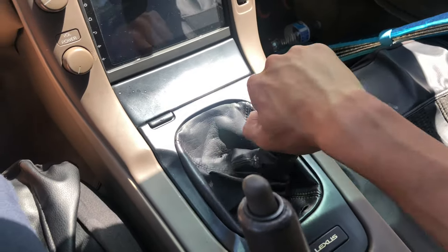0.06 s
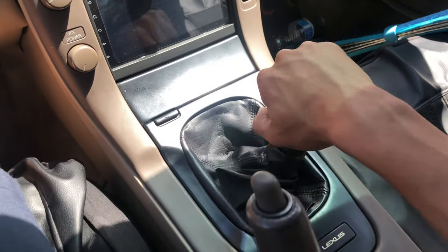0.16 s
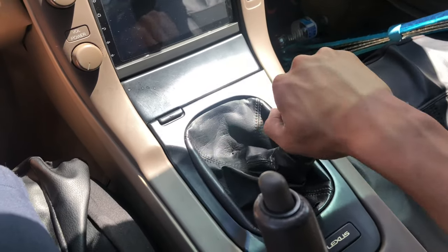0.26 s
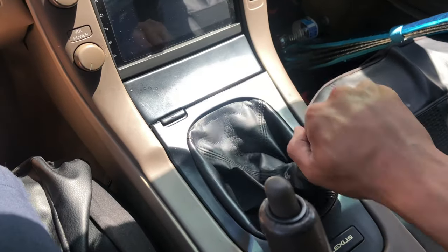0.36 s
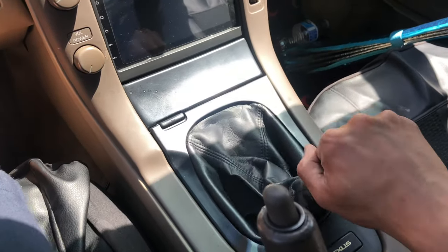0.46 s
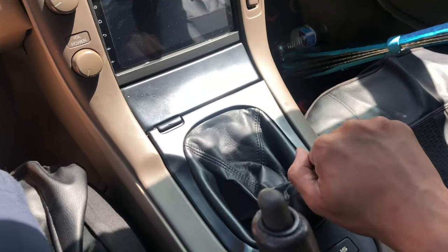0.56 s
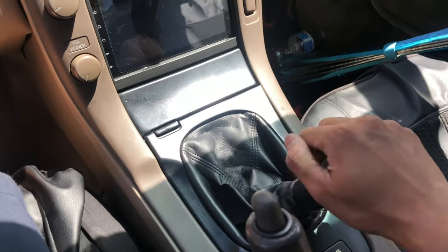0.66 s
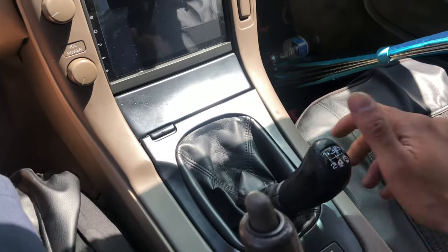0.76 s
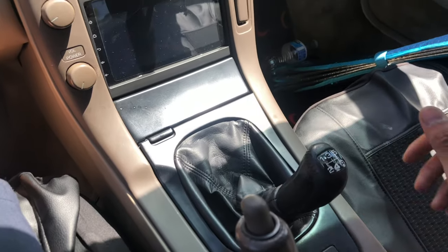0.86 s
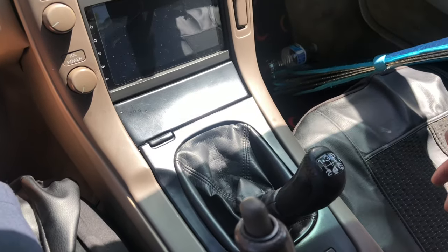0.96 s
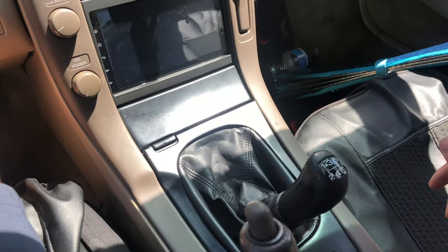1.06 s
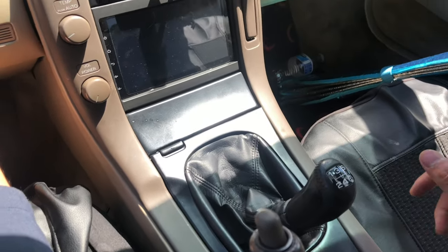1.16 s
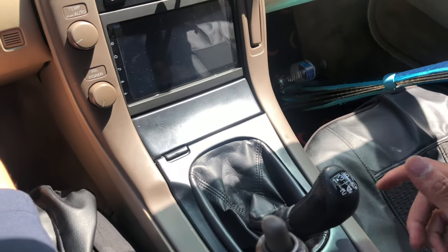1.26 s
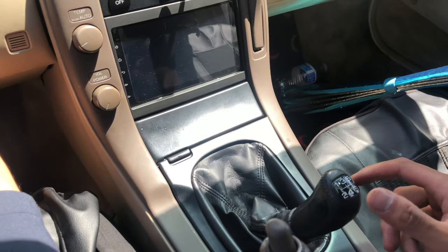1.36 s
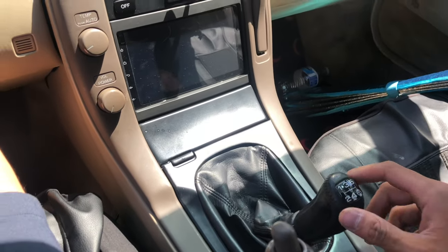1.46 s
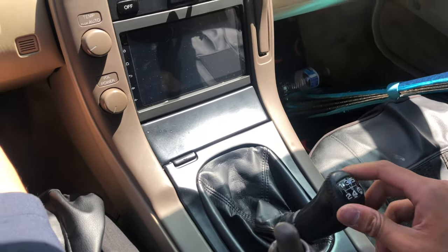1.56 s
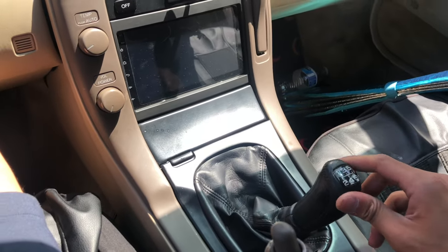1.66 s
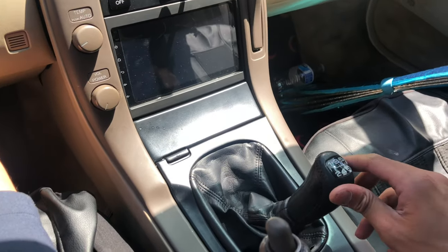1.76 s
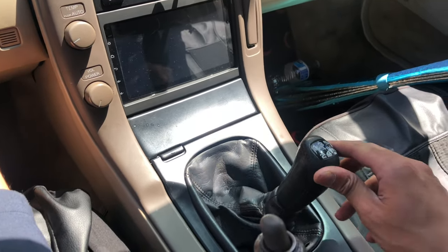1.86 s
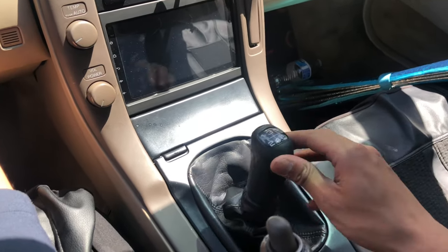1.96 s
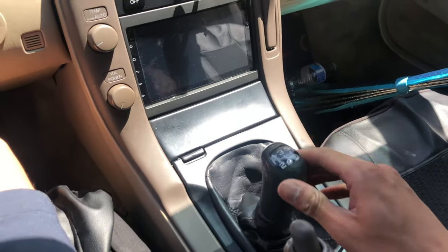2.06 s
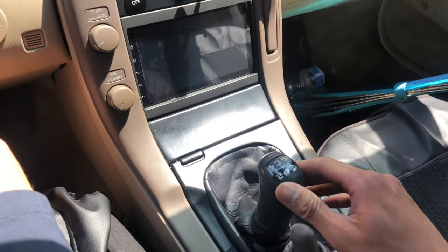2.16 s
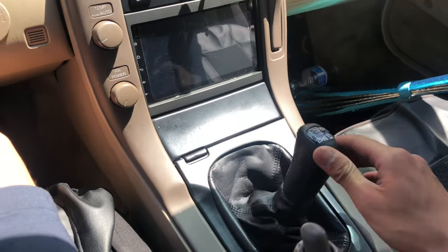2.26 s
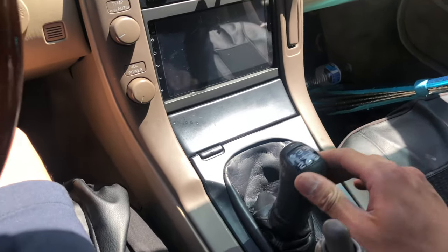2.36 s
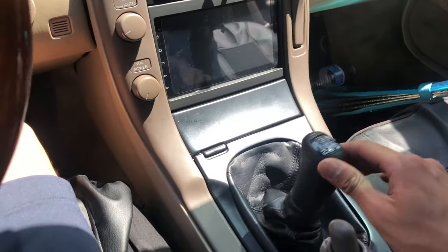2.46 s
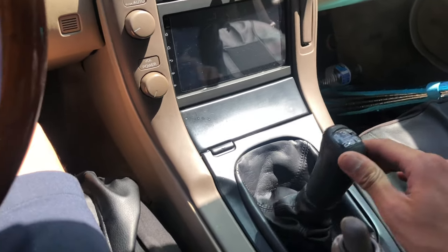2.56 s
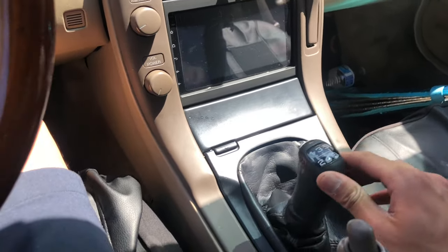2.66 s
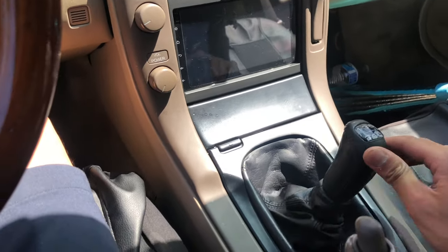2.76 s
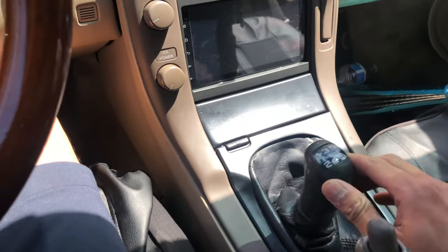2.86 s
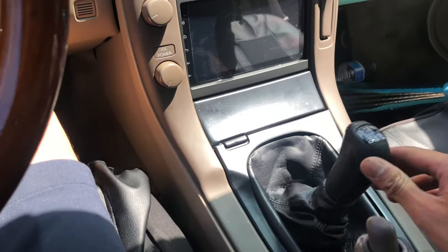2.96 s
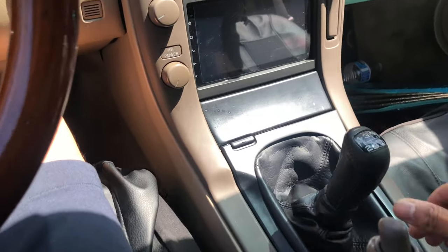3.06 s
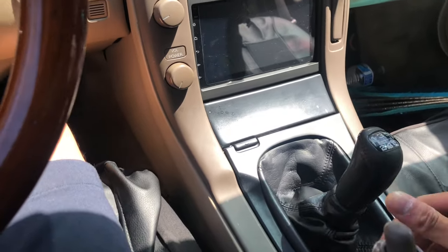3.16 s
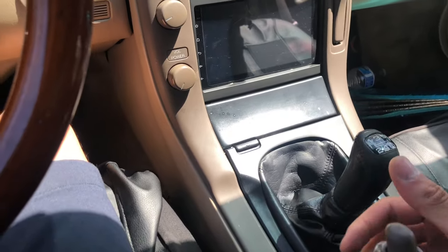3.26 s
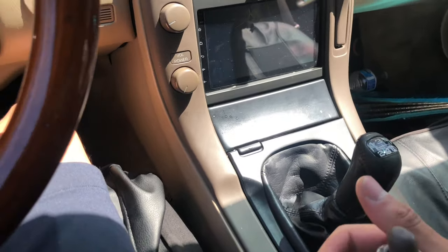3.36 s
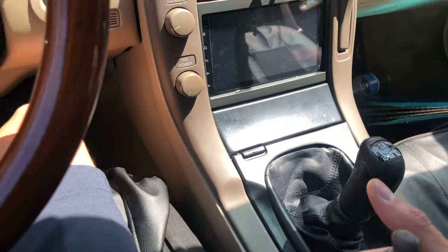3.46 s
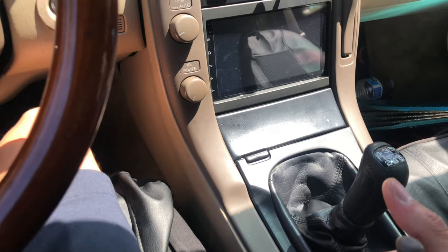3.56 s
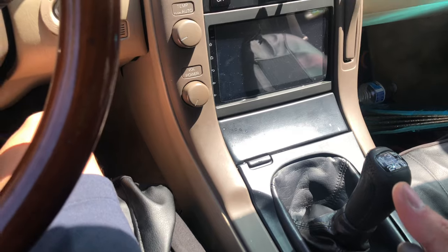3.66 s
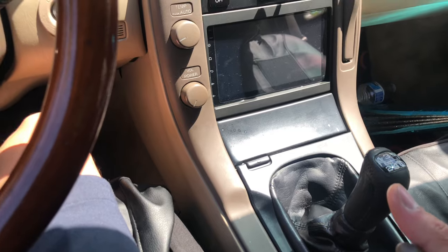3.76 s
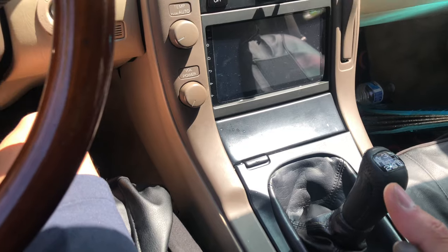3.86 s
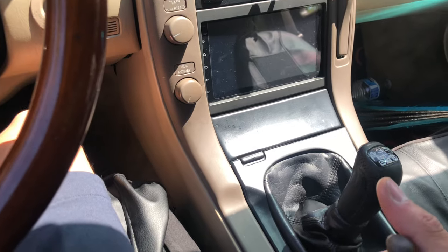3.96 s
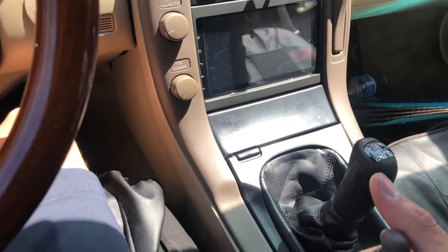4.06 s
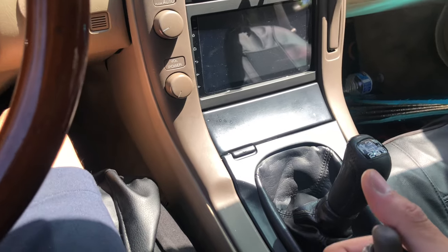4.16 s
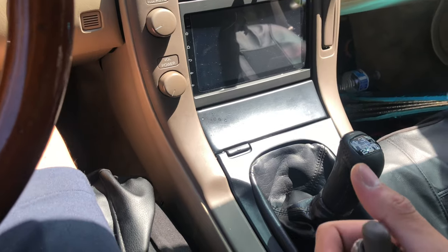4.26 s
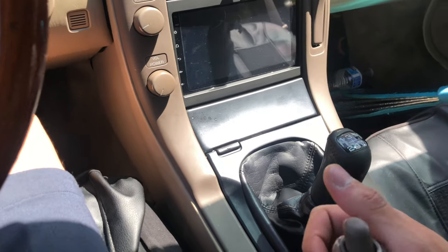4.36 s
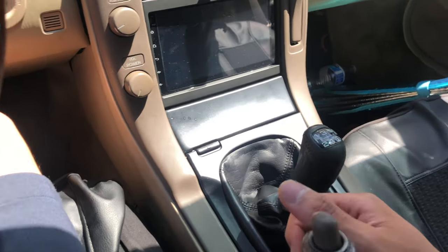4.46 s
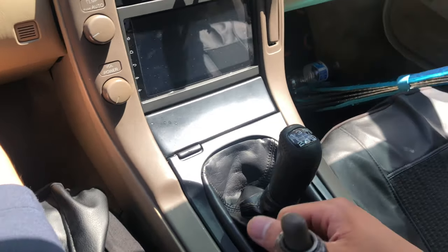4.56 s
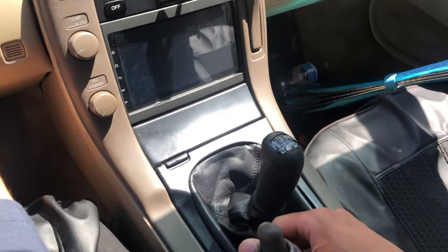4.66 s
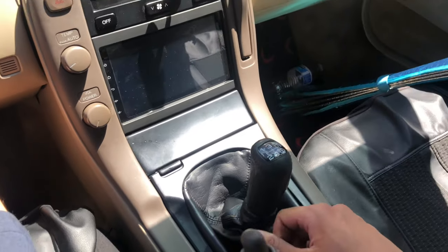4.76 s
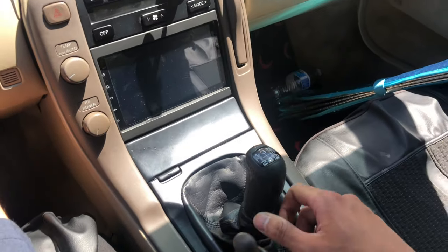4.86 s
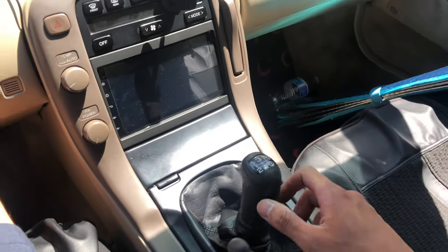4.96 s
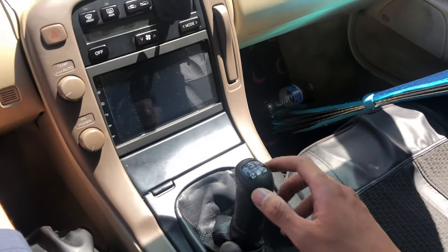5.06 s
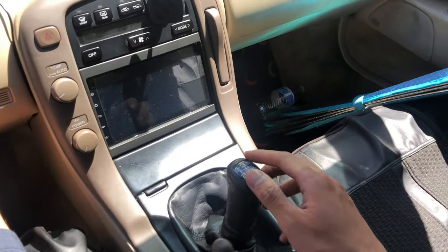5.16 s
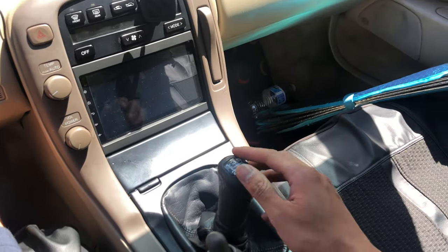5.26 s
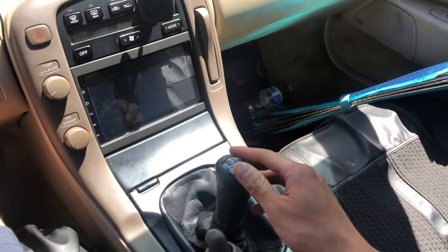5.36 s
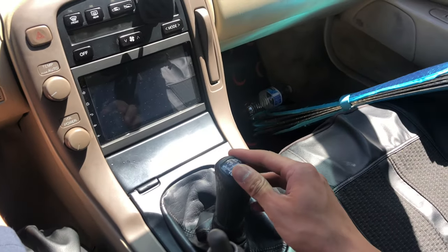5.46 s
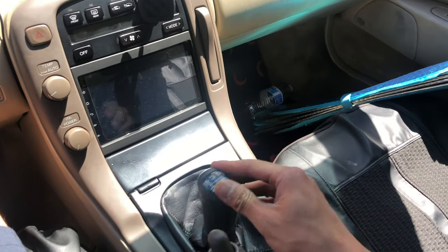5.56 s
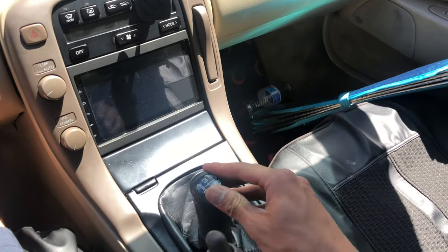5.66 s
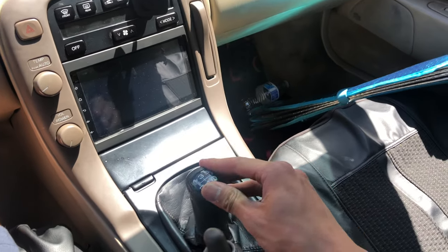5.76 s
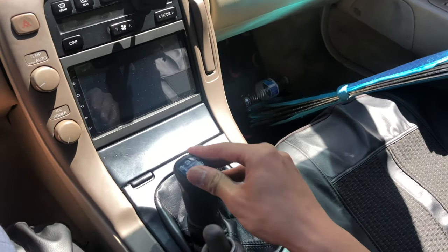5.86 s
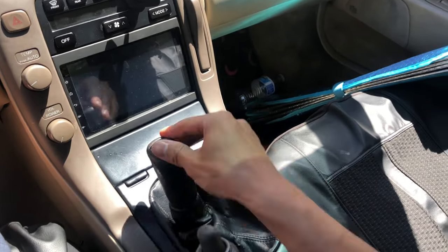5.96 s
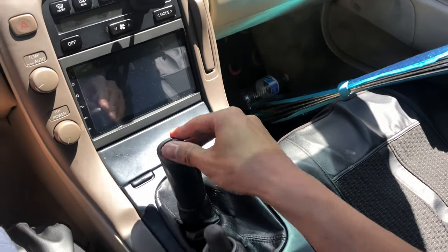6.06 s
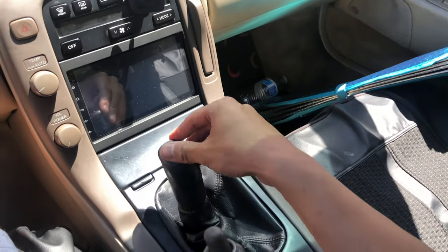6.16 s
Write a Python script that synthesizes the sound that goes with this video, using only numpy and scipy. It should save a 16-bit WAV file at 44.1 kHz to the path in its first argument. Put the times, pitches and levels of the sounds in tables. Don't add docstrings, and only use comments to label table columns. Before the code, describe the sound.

Close dry gear lever handling: an early clack and thud, loose rattling wiggles with faint squeaks, a sparse lull, then solid clunks with leather creaks.

```python
import sys
import numpy as np
from scipy import signal
from scipy.fft import rfft, irfft, next_fast_len
from scipy.io import wavfile
from scipy.ndimage import uniform_filter1d, map_coordinates

SR = 44100
rng = np.random.default_rng(int(sys.argv[2]) if len(sys.argv) > 2 else 0)


def to_linear_factor(level_db):
    exponent = np.asarray(level_db, float) / 20
    return 10 ** exponent


def to_wav(s):
    ch = np.atleast_2d(s).T
    pcm = np.round(np.clip(ch, -1, 1) * 32767)
    wavfile.write(sys.argv[1], SR, pcm.astype(np.int16))


N = 272979

# time in seconds, motion level in dB, resting pressure in dB.
STROKE = [(0.0, -57.5, -65), (0.31, -60, -70), (0.47, -48.5, -72), (0.65, -60, -62), (1.02, -70, -78),
          (1.57, -65, -76.5), (1.74, -74.5, -75), (1.93, -55.5, -61.5), (2.1, -57.5, -68),
          (2.86, -54.5, -68.5), (3.09, -61.5, -68), (3.79, -69, -74), (4.26, -66.5, -73.5), (4.6, -59, -64),
          (5.03, -60.5, -63), (5.41, -66, -72), (6.0, -54, -74), (6.19, -65, -61)]
# start in seconds, hold in seconds, boot level in dB, skin level in dB,
# extra level of the skin's top octave in dB.
PUSHES = [(0.042, 0.015, -58, -64, -7), (0.14, .001, -64.5, -75, -12), (0.232, 0.25, -57.5, -68, -5.5),
          (0.362, 0.082, -45, -57.5, -8.5), (0.485, 0.0086, -62.5, -66.5, -2),
          (0.608, 0.045, -58, -57.5, -6), (0.68, 0.031, -60, -56, 0.5), (4.93, .03, -61, -69.5, -9),
          (3.863, .03, -68, -70, -4.5), (0.81, .02, -67, -73, -4), (0.85, 0.074, -65, -70.5, -1),
          (1.528, .001, -72, -75, -.2), (1.658, 0.0024, -62, -68.5, -9), (1.72, .001, -72, -72.5, 3.5),
          (3.396, 0.0037, -67, -78, -10), (3.519, 0.16, -71, -71.5, 0.5), (3.894, .001, -62, -69, -4),
          (4.49, .001, -66, -70, -10), (4.685, 0.033, -54.5, -66, -6), (4.947, 0.068, -58, -67.5, 0),
          (5.37, 0.019, -62.5, -74, -1), (5.611, 0.0043, -55.5, -67, -5), (5.696, .001, -68, -68, -1.5),
          (5.847, .001, -58.5, -59, -1), (5.903, 0.043, -52.5, -63, -9), (5.974, 0.011, -45, -53, -2),
          (6.12, 0.067, -57, -65.5, -1)]
# start in seconds, hold in seconds, boot level in dB, skin level in dB.
WIGGLE = [(1.881, 0.037, -62, -62.5), (1.969, 0.0045, -48.5, -56.5), (2.07, 0.035, -61, -68),
          (2.24, 0.038, -57, -69), (2.416, 0.00064, -47, -62), (2.527, 0.0013, -55.5, -64.5),
          (2.643, .001, -55.5, -63.5), (2.767, 0.0011, -56.5, -65), (2.889, .001, -52, -61),
          (2.956, 0.11, -60.5, -66), (3.184, .001, -64, -69.5)]
# frequency in Hz, density in dB per Hz.
MOTION_SPECTRUM = [(21, -29), (35, -1.5), (91, -4), (130, -2), (239, -12), (335, -6.5), (379, -12),
                   (520, -15), (680, -28), (1140, -120)]
CREAK_SPECTRUM = [(210, -42), (350, -5.5), (956, -5.5), (1040, -6), (1200, -7.5), (1540, -7.5), (1770, -6),
                  (2690, -13.5), (3600, -20.5), (4680, -41), (7920, -120)]
SKIN_SPECTRUM = [(1900, -19), (3300, -1), (5500, 0.5), (7500, -7.5), (9000, -44)]
SKIN_TOP_SPECTRUM = [(6800, -17.5), (8500, -7.5), (12000, -11), (15500, -14)]
HUSH_SPECTRUM = [(13, -30), (22, -18), (37, 0.5), (59, 2.5), (87, -22), (125, 3), (169, -12.5), (242, -10),
                 (302, -24), (409, -23.5), (482, -25), (771, -22.5), (1710, -33.5), (7000, -35),
                 (16000, -39)]
# centre in Hz, width in Hz, level in dB.
BOOT_MODES = [(548, 170, 3), (900, 350, -6), (1235, 280, -0.5), (1740, 420, -9), (2350, 270, -5),
              (2940, 400, -8.5)]
# start in seconds, peak in dB, pitch in Hz.
RATTLES = [(0.0514, -45.5, 1760), (0.278, -51, 1700), (0.332, -48.5, 2940), (0.385, -40, 1740),
           (0.579, -53, 1500), (0.615, -46, 1350), (0.676, -55, 1390), (2.545, -55, 2100),
           (2.883, -45.5, 2100), (0.405, -43.5, 3150), (2.041, -55, 1450), (0.593, -50, 1620),
           (0.607, -46, 1550), (0.6466, -48, 1290), (0.6648, -49, 1390), (0.686, -49, 1560),
           (0.716, -49, 1460), (1.545, -53.5, 2320), (1.8916, -50, 2120), (1.958, -48, 1720),
           (2.017, -51, 1410), (2.264, -47, 1840), (2.3887, -43.5, 2070), (2.4214, -39.5, 1400),
           (2.5081, -48.5, 1713), (2.6479, -42, 2050), (2.743, -49, 2000), (2.7736, -49, 2140),
           (2.9845, -45, 2070), (3.1652, -51.5, 2500), (3.4014, -52, 2680), (3.8997, -47, 1580),
           (3.8995, -46, 2590), (5.0038, -46, 2000), (5.005, -51, 1600), (0.046, -49, 2350),
           (0.001, -53, 2270), (6.177, -51, 2000), (2.092, -55, 1900), (2.4, -45, 1850), (0.624, -49, 1500),
           (5.956, -42, 1980), (6.049, -48.5, 1860)]
# start in seconds, peak in dB, pitch in Hz, t60 in seconds.
CLACKS = [(0.459, -43, 527, 0.034), (0.934, -51, 1700, 0.017), (0.924, -52, 810, 0.018),
          (0.951, -51.5, 1090, 0.028), (1.985, -48, 696, 0.053), (1.893, -51, 900, .03),
          (2.545, -50, 554, .03), (1.8615, -48, 600, 0.05), (1.947, -49, 740, 0.037),
          (1.962, -45.5, 708, 0.24), (2.117, -46, 562, 0.047), (2.369, -56, 1260, 0.043),
          (2.658, -44.5, 560, 0.051), (4.693, -41, 570, 0.029), (4.711, -35.5, 600, 0.077),
          (5.84, -45, 1100, 0.03), (5.844, -41, 610, 0.022), (5.9, -28.5, 660, 0.014),
          (5.9765, -36, 1000, 0.02)]
# centre in Hz, width in Hz, level in dB.
CONSOLE_MODES = [(750, 24, -11), (1280, 46, -3), (1470, 15, -14), (2000, 51, -16), (2760, 48, -21),
                 (3500, 54, -7), (4290, 25, -60), (4860, 60, -23), (5240, 60, -10)]
# start in seconds, peak in dB, pitch in Hz.
TAPS = [(0.026, -41, 475), (0.095, -55, 800), (0.117, -51, 530), (0.15, -49.5, 900), (0.17, -60, 900),
        (0.21, -45.5, 786), (0.3, -47, 510), (0.235, -52, 700), (0.313, -54, 500), (2.95, -52, 900),
        (3.401, -51, 1070), (3.909, -47, 750), (5.398, -54, 800), (5.372, -52, 800), (3.773, -60, 730),
        (4.551, -58, 550), (2.042, -53, 2100), (2.84, -52, 1880), (2.876, -45, 470), (3.52, -44.5, 674),
        (3.583, -54, 694), (3.658, -52.5, 657), (3.79, -48, 655), (3.865, -50.5, 930), (4.419, -40.5, 676),
        (4.4786, -35.5, 545), (5.362, -50, 780), (5.518, -52, 1000), (5.608, -44.5, 470), (5.682, -50, 535),
        (5.751, -47, 480), (6.057, -49, 1910)]
# frequency in Hz, level in dB, t60 in seconds.
TRIM_MODES = [(900, -2, .012), (1200, -1, .011), (1550, -1, .01), (1900, 0, .011), (2200, -3, .008)]
# start in seconds, peak in dB, pitch in Hz, t60 in seconds.
KNOCKS = [(0.028, -42, 440, 0.032), (0.362, -33, 440, 0.03), (0.064, -44, 292, 0.037),
          (0.39, -36, 215, .05), (0.243, -48.5, 324, 0.088), (0.61, -47.5, 482, 0.043),
          (0.975, -51.5, 480, 0.03), (4.481, -44, 540, .04), (0.372, -39.5, 328, 0.073),
          (0.41, -39, 300, .08), (5.057, -47.5, 294, 0.026), (5.188, -51.5, 199, 0.046),
          (4.052, -49, 223, 0.065), (4.51, -48.5, 216, 0.055), (4.693, -29.5, 272, 0.038),
          (4.711, -26.5, 296, 0.093), (5.166, -37.5, 196, 0.0083), (5.9, -37.5, 336, 0.12),
          (5.977, -24.5, 245, 0.019), (4.716, -27.5, 224, 0.11), (5.005, -38.5, 278, 0.032)]
# start in seconds, peak in dB, pitch in Hz,
# t60 in seconds.
BUMPS = [(1.903, -43.5, 323, 0.039), (1.953, -42.5, 404, 0.04), (2.033, -52.5, 433, 0.047),
         (2.093, -52, 431, 0.044), (2.115, -46, 343, 0.053), (2.217, -55, 363, 0.037),
         (2.265, -48, 330, 0.04), (2.345, -56, 339, 0.04), (2.368, -55, 334, 0.04),
         (2.391, -46, 214, 0.053), (2.421, -40.5, 269, 0.032), (2.51, -48, 280, 0.034),
         (2.594, -55, 345, 0.046), (2.627, -47, 369, 0.04), (2.655, -46, 336, 0.04),
         (2.683, -46, 318, 0.043), (2.745, -55, 310, 0.04), (2.79, -51.5, 560, 0.046),
         (2.832, -57, 304, 0.04), (2.85, -54, 333, 0.037), (2.875, -46.5, 317, 0.028),
         (2.928, -48, 554, 0.036), (2.995, -49, 296, 0.04)]
# start in seconds, peak in dB, centre in Hz.
TICKS = [(0.1331, -53, 6400), (0.1341, -52, 2300), (0.2251, -46, 5600), (0.2899, -37, 6500),
         (0.3557, -40, 4700), (0.3891, -36, 5900), (0.4467, -41, 4200), (0.4586, -40, 4900),
         (0.5781, -56, 5400), (0.6047, -38, 5900), (0.6131, -35, 5100), (0.6281, -48, 5900),
         (0.6469, -38, 6800), (0.6651, -41, 5900), (0.7351, -52, 6100), (0.9331, -58, 5400),
         (1.9451, -38, 7200), (1.9455, -42, 3600), (2.4211, -36, 3000), (2.4214, -39, 9900),
         (2.4251, -39, 5000), (2.5444, -53, 5600), (2.6341, -52, 3400), (2.6481, -50, 4100),
         (2.7471, -50, 5600), (2.7753, -48, 5600), (2.8661, -52, 3600), (2.8768, -44, 5300),
         (3.1655, -57, 4500), (3.4009, -55, 3400), (3.8991, -47, 2500), (4.5466, -55, 4800),
         (4.7081, -41, 8800), (4.7135, -41, 2800), (4.7149, -39, 9400), (5.3681, -48, 3000),
         (5.3731, -49, 2800), (5.3935, -47, 3000), (5.3991, -50, 3000), (5.8036, -50, 4100),
         (5.8385, -48, 4800), (5.8991, -48, 5000), (5.9721, -31, 3800), (5.9791, -38, 3400),
         (6.0491, -51, 3400), (6.0571, -53, 3400), (6.1031, -56, 4400)]
# start in seconds, peak in dB,
# brightness in dB per octave.
PULLED = [
    (0.3553, -35, 1),
    (0.3578, -26, -4),
    (0.356, -34, -1),
    (5.9718, -24, 2),
    (5.9748, -22, -3),
]
NUDGED = [
    (4.7105, -29, 0),
    (4.7135, -33, 2.2),
]
# frequency in Hz, level in dB,
# t60 in seconds.
PULLED_MODES = [(736, -0.5, 0.03), (1290, -5, .03), (1538, -5, 0.021), (1920, -9.5, 0.024),
                (2680, -11.5, 0.026), (3638, -16.5, 0.025), (4270, -17.5, .03), (4780, -17, 0.017),
                (5250, -16, 0.018)]
NUDGED_MODES = [(621, -3, .06), (460, -4, .05), (800, 1.5, 0.037), (1068, -9, 0.052), (1600, -5.5, 0.037),
                (3450, -11, 0.025), (4930, -17.5, 0.021), (5450, -15, .025)]
# start in seconds, end in seconds, from in Hz, to in Hz, level in dB.
SLIDES = [
    (3.54, 3.63, 4100, 4400, -77),
    (3.6, 3.68, 3900, 4800, -75.5),
    (3.63, 3.7, 5600, 5100, -77),
    (3.81, 3.91, 2100, 2900, -71.5),
    (2.04, 2.075, 1300, 1900, -66),
    (0.372, .42, 2800, 3300, -57),
]
# start in seconds, peak in dB, pitch in Hz,
# t60 in seconds.
THUDS = [(0.399, -42.5, 122, 0.38), (0.459, -40.5, 65.3, 0.3), (0.943, -31.5, 87.5, 0.17),
         (1.892, -52, 126, 0.25), (1.947, -44, 112, 0.15), (3.439, -41.5, 129, 0.11),
         (5.608, -51.5, 126, 0.25), (5.979, -30.5, 77.5, 0.067), (6.039, -41.5, 142, 0.12),
         (4.734, -33.5, 76, 0.41), (4.81, -40.5, 71.3, 0.41), (5.012, -30.5, 125.4, 0.041),
         (5.914, -26.5, 75.5, 0.22), (5.03, -42.5, 61, 0.1), (5.18, -50, 58.5, 0.22),
         (6.07, -45, 57.6, 0.13)]
# start in seconds, peak in dB, pitch in Hz, t60 in seconds.
CUSHIONED = [
    (0.933, -26.5, 317, 0.016),
    (0.934, -42.5, 576, 0.013),
    (3.404, -35.5, 129, 0.03),
    (4.72, -28, 291, 0.022),
    (4.712, -39.5, 145, 0.034),
    (2.787, -47.5, 142, 0.022),
    (2.688, -49, 119, 0.024),
    (2.922, -44.5, 159, 0.023),
    (2.091, -43.5, 163, 0.024),
]
# start in seconds, end in seconds, pitch in Hz, level in dB, waver 0-1.
SQUEAKS = [(0.48, 0.645, 1745, -68.5, 0.2), (2.14, 2.213, 834, -75, 0.46), (2.3, 2.357, 1157, -70, 0.7),
           (2.655, 2.716, 1740, -73, 0.6), (2.055, 2.12, 845, -61.5, 0.05), (2.136, 2.17, 1676, -70, 0.1),
           (2.221, 2.295, 1210, -60.5, 0.3), (2.241, 2.314, 1794, -68, 0.5), (2.413, 2.468, 900, -63, 0.6),
           (2.503, 2.57, 1756, -67, 0.9), (4.651, 4.704, 1504, -68, 0.5), (4.812, 4.87, 1270, -60.5, 0.9),
           (4.865, 4.987, 1268, -63.5, 0.5), (4.98, 5.126, 1104, -63, 0.77), (5.173, 5.21, 793, -71, 0.9),
           (5.205, 5.265, 1143, -71, 0.6), (5.409, 5.514, 770, -71, 0.5), (6.107, 6.185, 1990, -64.5, 0.24),
           (5.13, 5.2, 1085, -74, .8), (4.83, 4.87, 1920, -73, 0.5), (5.298, 5.311, 1720, -74, .5)]
# frequency in Hz, t60 in seconds.
CABIN_T60 = [(100, 0.25), (1000, 0.034), (10000, 0.045)]

TOP_HZ = 15850
HUSH_DB = -62
SKIN_REST_DB, REST_TOP_DB, WIGGLE_TOP_DB = -9.5, -6.5, -3.5
RISE_S, FALL_S, SEIZE = 0.082, 0.055, 4.5
CHATTER_S, CHATTER_GAP_S, CHATTER_DB, CHATTER_HZ = 6.116, 0.0123, -46, 6000
TAP_T60_S, TAP_SCATTER_DB, TAP_DETUNE = 0.018, 1.5, 0.04
HARD_DB, DULLING = -39.5, 0.37
CUSHION_S = 0.05


def unit(x):
    return x / np.sqrt(np.mean(x ** 2) + 1e-20)


def along(points, hz):
    f, v = np.transpose(points)
    return np.interp(np.log(hz + 1), np.log(f + 1), v)


def curves(rows):
    s, *cols = np.transpose(rows)
    return [np.interp(np.arange(N) / SR, s, c) for c in cols]


def wobble(rate_hz):
    knots = rng.standard_normal(int(N * rate_hz / SR) + 4)
    return map_coordinates(knots, [np.arange(N) * rate_hz / SR])


def filtered(x, response):
    m = next_fast_len(len(x) + 4096)
    return irfft(rfft(x, m) * response(np.fft.rfftfreq(m, 1 / SR)), m)[:len(x)]


def resonance(hz, centre_hz, width_hz):
    return 1j * hz * width_hz / (centre_hz ** 2 - hz ** 2 + 1j * hz * width_hz)


def coloured(x, spectrum):
    low_hz, high_hz = spectrum[0][0], min(spectrum[-1][0], TOP_HZ)
    return unit(filtered(x, lambda hz: to_linear_factor(along(spectrum, hz)) * ((hz > low_hz) & (hz < high_hz))))


def grit(rate_hz, spread_db, smooth):
    happens = rng.random(N) < rate_hz / SR
    size = to_linear_factor(spread_db * rng.exponential(size=N).clip(0, 4))
    return unit(happens * size * rng.standard_normal(N)) + smooth * rng.standard_normal(N)


def add(track, s, db, sound):
    part = track[round(s * SR):][:len(sound)]
    part += to_linear_factor(db) * sound[:len(part)] / np.abs(sound).max()


def swings(rows, rise_s, order=1):
    out, t = np.zeros(N), np.arange(SR // 2) / SR
    for s, db, hz, t60_s in rows:
        onset = (1 - np.exp(-t / rise_s)) ** order
        add(out, s, db, np.sin(2 * np.pi * hz * t) * to_linear_factor(-60 * t / t60_s) * onset)
    return out


def skips():
    return [(CHATTER_S + CHATTER_GAP_S * k, CHATTER_DB + 1.5 * rng.normal()) for k in [0, 1, 2, 3, 4, 5.3]]


def hush():
    drift_db = 0.5 * wobble(2.5)
    return to_linear_factor(HUSH_DB + drift_db) * coloured(rng.standard_normal(N), HUSH_SPECTRUM)


def pushed(rest_db, peaks_db, loudest=True):
    t, out = np.arange(N) / SR, rest_db + np.zeros(N)
    for (s, hold_s, *_), db in zip(PUSHES + WIGGLE, peaks_db):
        rise_s = RISE_S / (1 + SEIZE * hold_s / RISE_S)
        share = np.interp(t, [s - rise_s, s, s + hold_s, s + hold_s + FALL_S], [0, 1, 1, 0])
        level = rest_db + share * (db - rest_db)
        out = np.maximum(out, level) if loudest else out + level - rest_db
    return out


def crackle():
    out = np.zeros(N)
    for centre_hz, width_hz, db in BOOT_MODES:
        slips = grit(rate_hz=130, spread_db=3.0, smooth=0)
        out += to_linear_factor(db) * unit(filtered(slips, lambda hz: resonance(hz, centre_hz, width_hz) ** 2))
    return unit(out)


def rubbing():
    motion_db, rest_db = curves(STROKE)
    moves = PUSHES + WIGGLE
    creak_db = pushed(rest_db, [row[2] for row in moves])
    slide_db = pushed(rest_db + SKIN_REST_DB, [row[3] for row in moves])
    tops_db = [row[4] for row in PUSHES] + [WIGGLE_TOP_DB] * len(WIGGLE)
    top_db = pushed(REST_TOP_DB, tops_db, loudest=False)

    swing_db = creak_db - uniform_filter1d(creak_db, size=SR // 4)
    lumps_db = 0.3 * swing_db + 1.5 * wobble(30)
    rumble = coloured(grit(rate_hz=300, spread_db=2.5, smooth=0.89), MOTION_SPECTRUM)
    motion = to_linear_factor(motion_db + lumps_db) * rumble

    leather = coloured(grit(rate_hz=1200, spread_db=3.0, smooth=2.26), CREAK_SPECTRUM)
    creak = to_linear_factor(creak_db - 2.0 + 1.93 * wobble(60)) * (0.91 * leather + 0.46 * crackle())

    skin, flutter_db = grit(rate_hz=1800, spread_db=3, smooth=1.33), 0.7 * wobble(60)
    hiss = coloured(skin, SKIN_SPECTRUM) + to_linear_factor(top_db) * coloured(skin, SKIN_TOP_SPECTRUM)
    return motion + creak + to_linear_factor(slide_db - 1.87 + flutter_db) * hiss


def strikes(rows, breadth, tone):
    out, t = np.zeros(N), np.arange(SR // 8) / SR

    def panel(hz):
        modes = enumerate(CONSOLE_MODES)
        return 0.49 + sum((-1) ** k * to_linear_factor(d) * resonance(hz, c, w) for k, (c, w, d) in modes)

    for s, db, centre_hz, t60_s in rows:
        def response(hz):
            near = resonance(hz, centre_hz, breadth * centre_hz) ** 2
            return panel(hz) * near / (1 + 1j * hz / (1.95 * centre_hz)) ** 2

        fade = to_linear_factor(-60 * t / t60_s) * (1 - np.exp(-t / 0.0012))
        ring = filtered(rng.standard_normal(len(t)) * fade, response)
        add(out, s - 0.001, db, unit(ring) + tone * unit(fade * np.sin(2 * np.pi * centre_hz * t)))
    return out


def clacks():
    rattles = [(s, db, hz, 0.016 * to_linear_factor(0.18 * (db + 42.5))) for s, db, hz in RATTLES]
    shaken = [(s, db - 0.5, 2900, 0.03) for s, db in skips()]
    out = strikes(CLACKS, breadth=0.82, tone=0.99)
    out += strikes(shaken, breadth=0.95, tone=0.28)
    return out + strikes(rattles, breadth=0.62, tone=0.95)


def taps():
    out, t = np.zeros(N), np.arange(SR // 16) / SR

    def ring(hz, t60_s):
        return np.sin(2 * np.pi * hz * t) * to_linear_factor(-60 * t / t60_s) * (1 - np.exp(-t * hz / 0.9))

    for s, db, own_hz in TAPS:
        sound = ring(own_hz, TAP_T60_S)
        level_luck, pitch_luck = rng.standard_normal((2, len(TRIM_MODES)))
        for k, (hz, mode_db, t60_s) in enumerate(TRIM_MODES):
            level_db = mode_db + TAP_SCATTER_DB * level_luck[k] + k * DULLING * min(db - HARD_DB, 0)
            sound += (-1) ** k * to_linear_factor(level_db) * ring(hz * (1 + TAP_DETUNE * pitch_luck[k]), t60_s)
        add(out, s - 0.0005, db, sound)
    return out


def knocks():
    return swings(KNOCKS + BUMPS, rise_s=0.0012)


def ticks():
    out, t = np.zeros(N), np.arange(SR // 32) / SR
    chatter = [(s, db, CHATTER_HZ) for s, db in skips()]
    for s, db, centre_hz in TICKS + chatter:
        def response(hz):
            return resonance(hz, centre_hz, 0.95 * centre_hz) ** 2 + 0.2 * resonance(hz, 14000, 9000)

        snap = rng.standard_normal(len(t)) + 0.4 * np.sin(2 * np.pi * centre_hz * t)
        add(out, s - 0.0005, db, filtered(snap * to_linear_factor(-60 * t / 0.011), response))
    return out


def stops(blows, modes):
    out, t = np.zeros(N), np.arange(SR // 8) / SR
    for s, db, tilt_db in blows:
        ring = np.zeros(len(t))
        for hz, mode_db, t60_s in modes:
            level_db = mode_db + tilt_db * np.log2(hz / modes[0][0])
            ring += to_linear_factor(level_db - 60 * t / t60_s) * np.sin(2 * np.pi * hz * t)
        add(out, s, db, ring * (1 - np.exp(-t / 0.0004)))
    return out


def slides():
    out, a, b = np.zeros(N), unit(wobble(700)), unit(wobble(700))
    for start, end, from_hz, to_hz, db in SLIDES:
        at = np.arange(round(start * SR), round(end * SR))
        phase = 2 * np.pi * np.cumsum(np.linspace(from_hz, to_hz, len(at))) / SR
        band = a[at] * np.sin(phase) + b[at] * np.cos(phase)
        out[at] += to_linear_factor(db) * np.hanning(len(at)) ** 0.5 * band
    return out


def thuds():
    return swings(THUDS, rise_s=0.0043) + swings(CUSHIONED, CUSHION_S, order=3)


def squeaks():
    out, pitch, size, fuzz = np.zeros(N), wobble(160), wobble(190), wobble(450)
    grip_db = 2.2 * wobble(70)
    for start, end, hz, db, waver in SQUEAKS:
        at = np.arange(round(start * SR), round(end * SR))
        u = np.linspace(0, 1, len(at))
        scoop = 0.05 * waver * np.exp(-(at / SR - start) / 0.03)
        phase = 2 * np.pi * np.cumsum(hz * (1 - scoop + 0.029 * waver * pitch[at])) / SR
        shape = np.sin(np.pi * u ** 0.64) ** 0.5 * to_linear_factor(db + 4.5 + waver * grip_db[at])
        shape *= 1 + 0.73 * waver * size[at]
        tone = np.sin(phase) + 0.063 * np.sin(2 * phase)
        out[at] += shape * (tone + 0.5 * waver * fuzz[at] * np.cos(phase))
    return out


def cabin(x):
    hz, t, z = signal.stft(rng.standard_normal(SR // 3), SR, nperseg=256)
    decay = to_linear_factor(-60 * t / along(CABIN_T60, hz)[:, None])
    tail = signal.istft(z * decay, SR, nperseg=256)[1]
    return signal.fftconvolve(np.pad(x, (130, 0)), tail / np.linalg.norm(tail))[:N]


def scene():
    steady = hush() + rubbing()
    sharp = clacks() + taps() + ticks() + slides() + squeaks()
    sharp += stops(PULLED, PULLED_MODES) + stops(NUDGED, NUDGED_MODES)
    knocking = knocks()
    echo = cabin(to_linear_factor(-7.5) * sharp + to_linear_factor(-13.5) * knocking)
    return (sharp + knocking + echo + thuds() + steady)[None]


def top_cut(x):
    return signal.sosfilt(signal.butter(12, 16470, fs=SR, output="sos"), x)


def record(dry):
    edge = lambda hz: np.where(hz < TOP_HZ, 1, to_linear_factor(-14) * (hz < 1.04 * TOP_HZ))
    mix = filtered(dry[0], edge)[None]
    return top_cut(mix)


dry = scene()
out = record(dry)
to_wav(out)
```